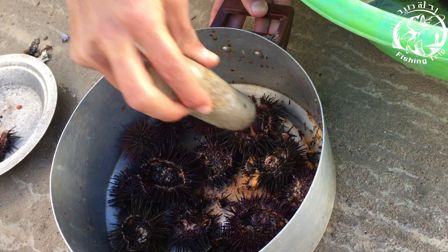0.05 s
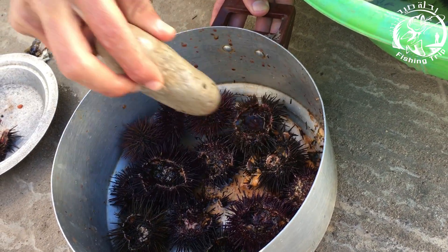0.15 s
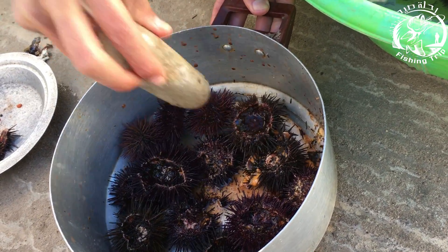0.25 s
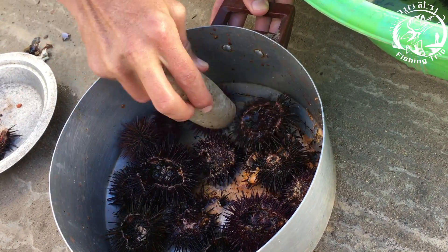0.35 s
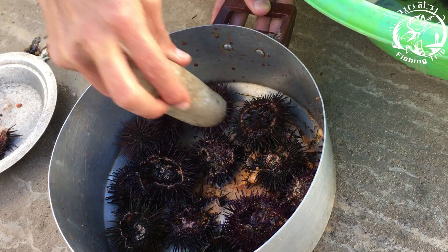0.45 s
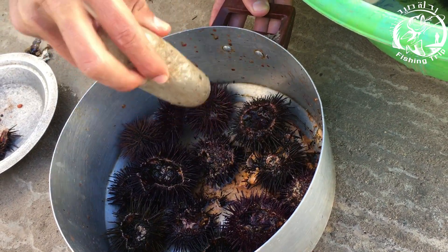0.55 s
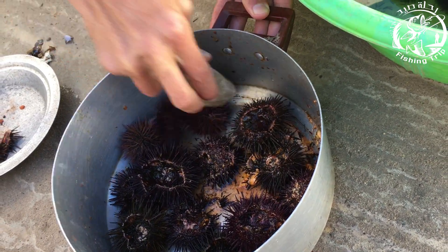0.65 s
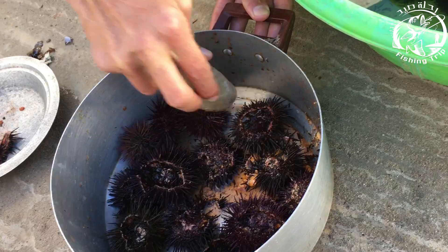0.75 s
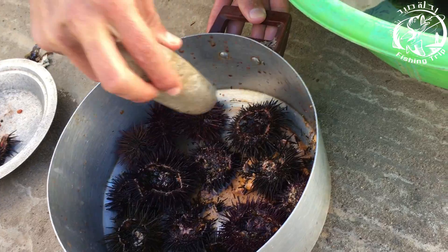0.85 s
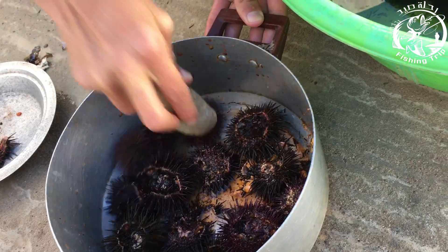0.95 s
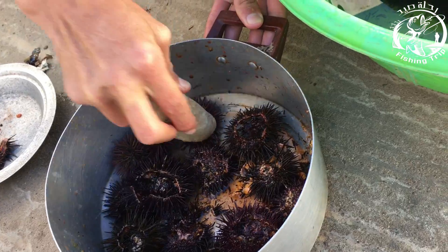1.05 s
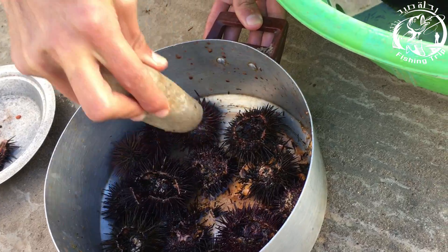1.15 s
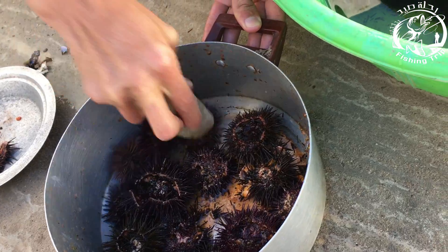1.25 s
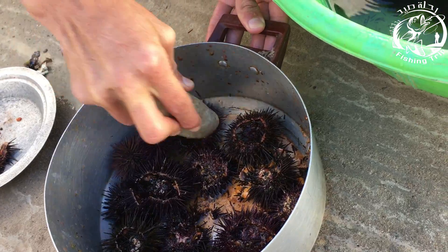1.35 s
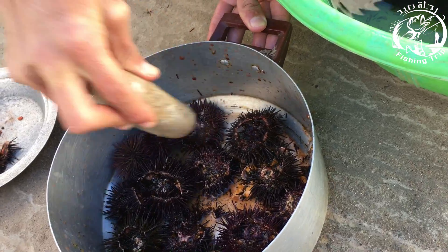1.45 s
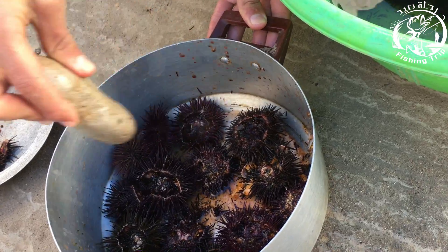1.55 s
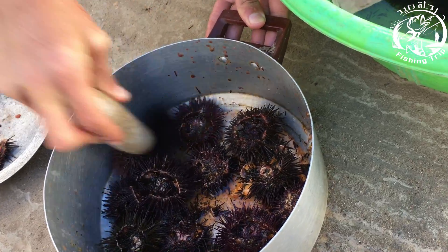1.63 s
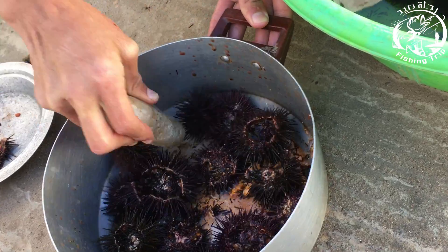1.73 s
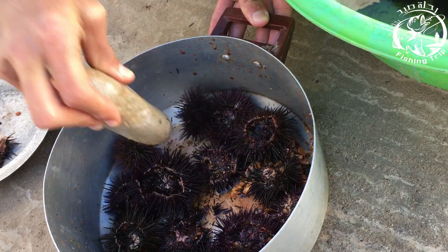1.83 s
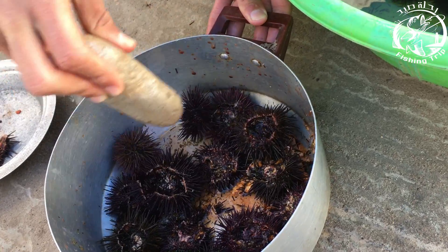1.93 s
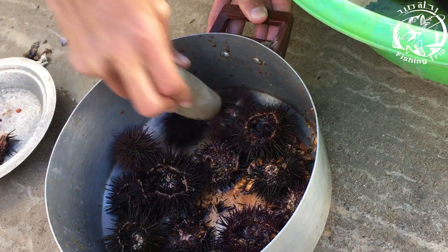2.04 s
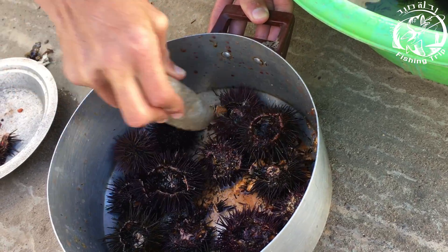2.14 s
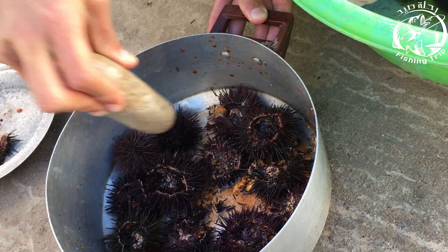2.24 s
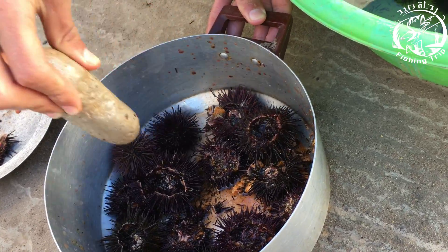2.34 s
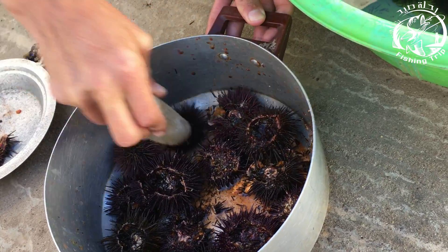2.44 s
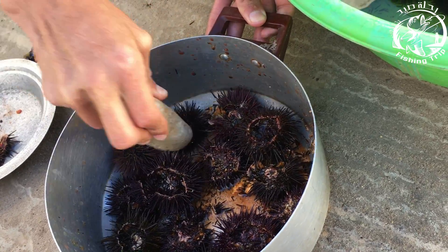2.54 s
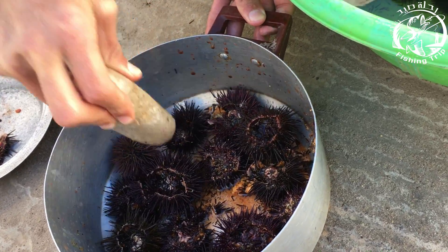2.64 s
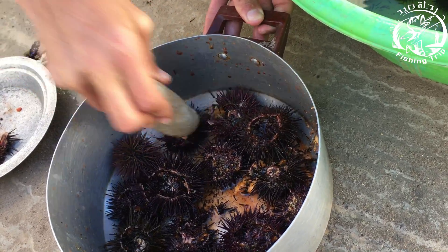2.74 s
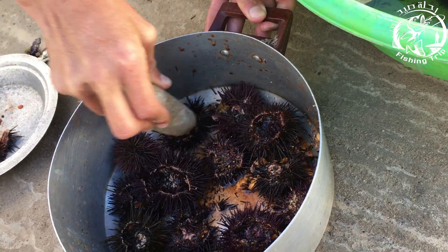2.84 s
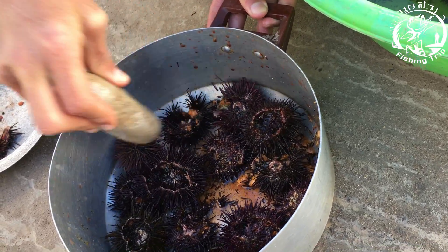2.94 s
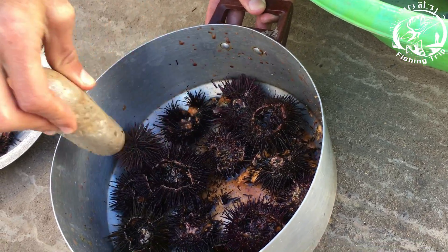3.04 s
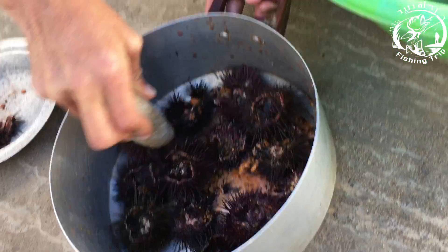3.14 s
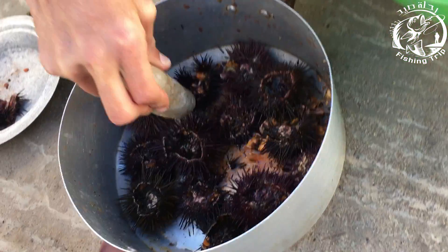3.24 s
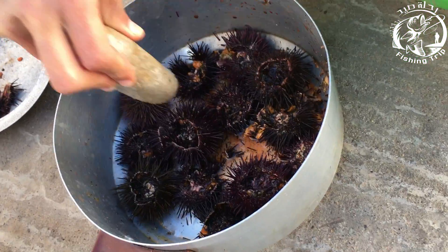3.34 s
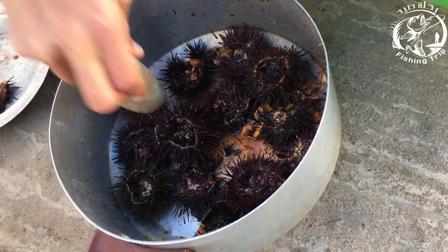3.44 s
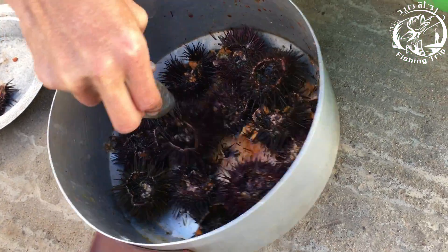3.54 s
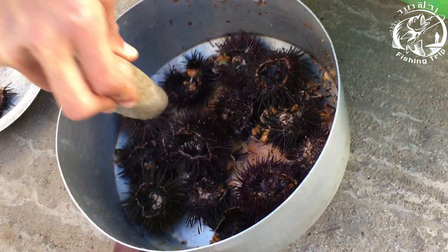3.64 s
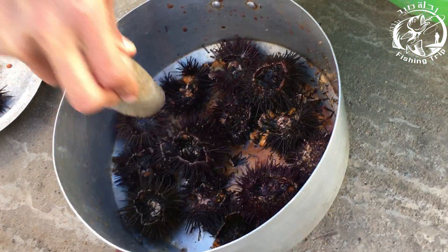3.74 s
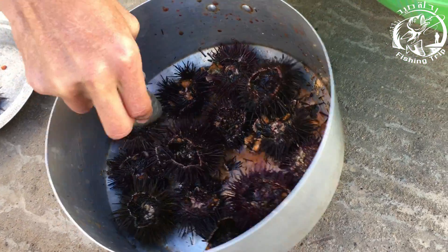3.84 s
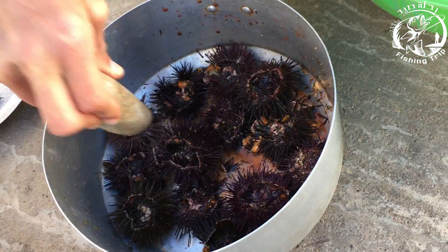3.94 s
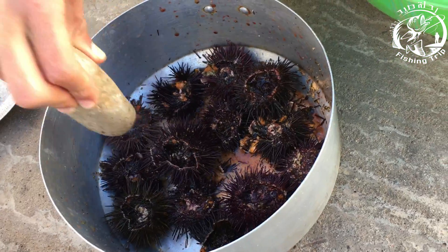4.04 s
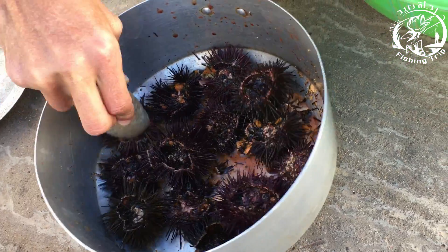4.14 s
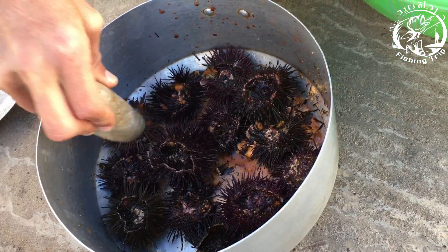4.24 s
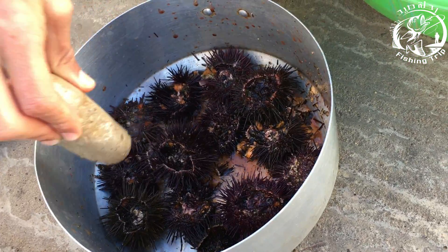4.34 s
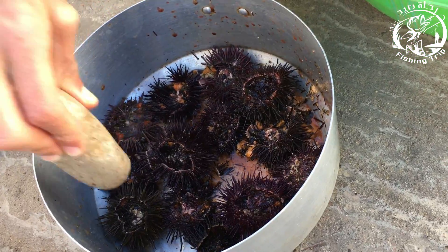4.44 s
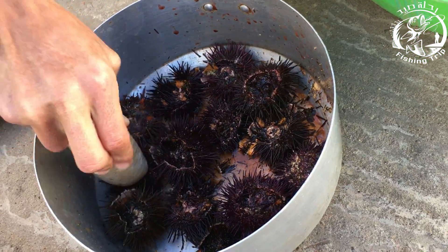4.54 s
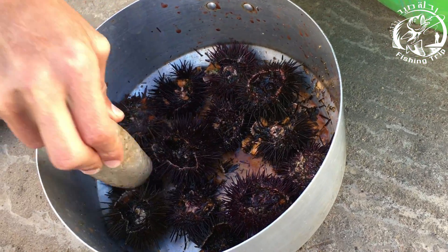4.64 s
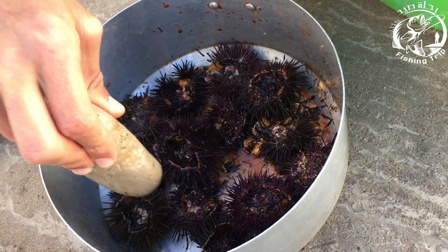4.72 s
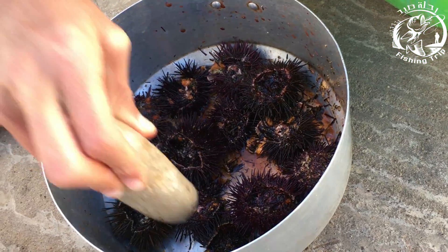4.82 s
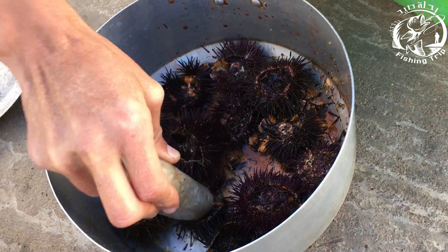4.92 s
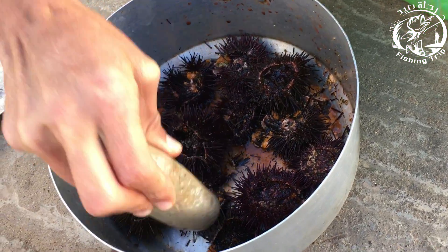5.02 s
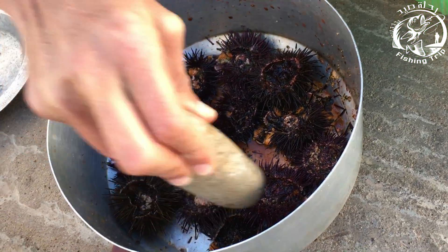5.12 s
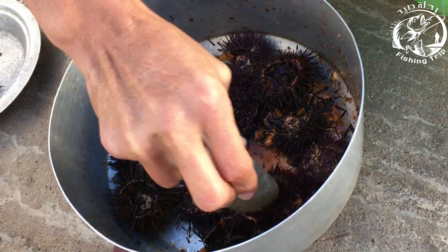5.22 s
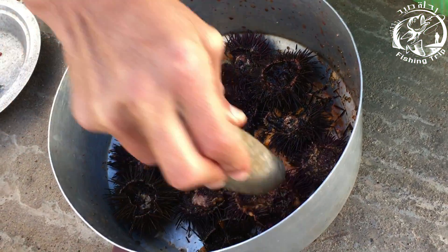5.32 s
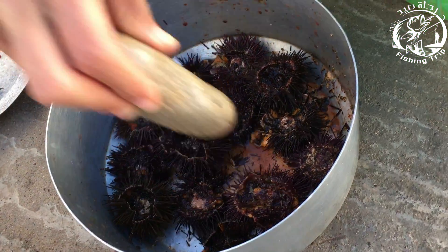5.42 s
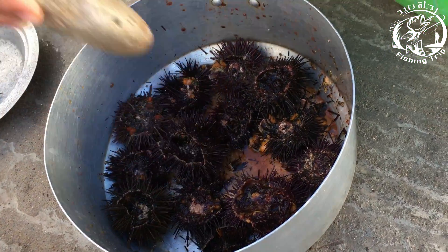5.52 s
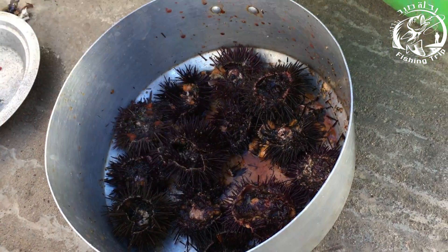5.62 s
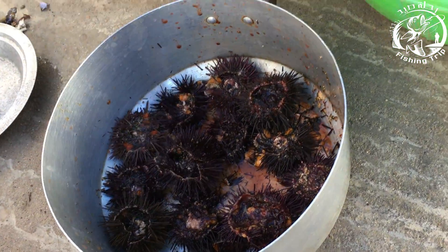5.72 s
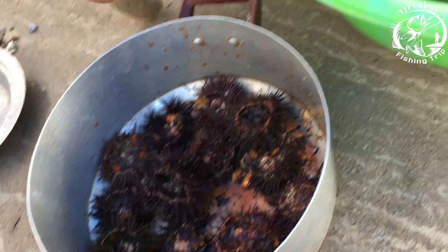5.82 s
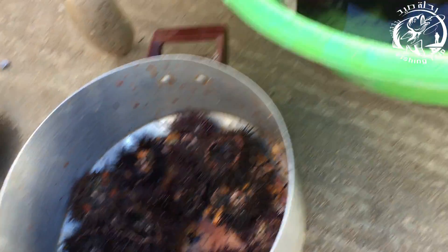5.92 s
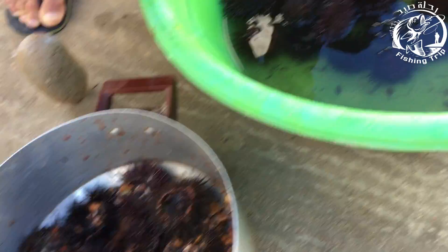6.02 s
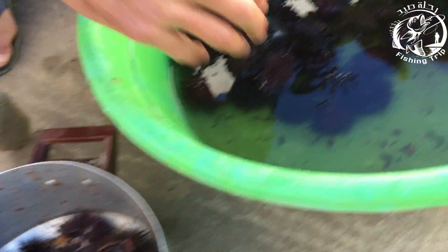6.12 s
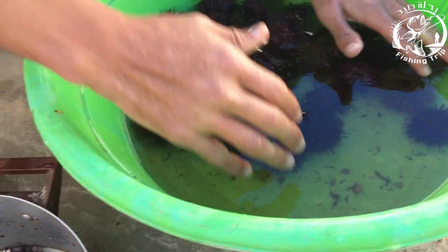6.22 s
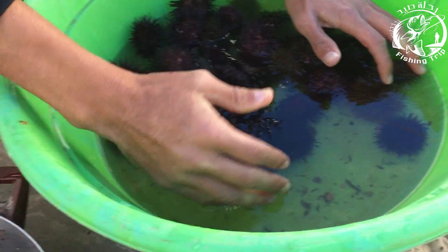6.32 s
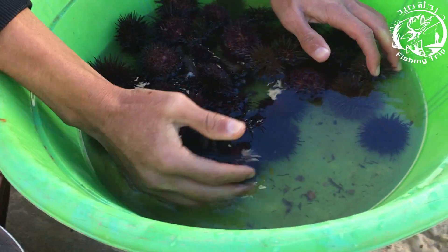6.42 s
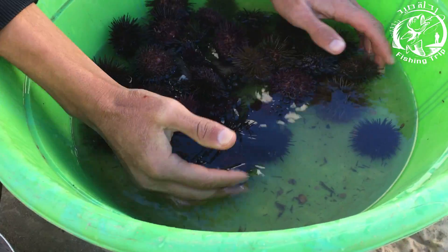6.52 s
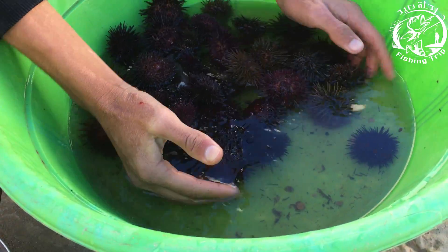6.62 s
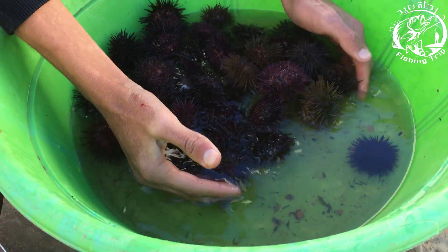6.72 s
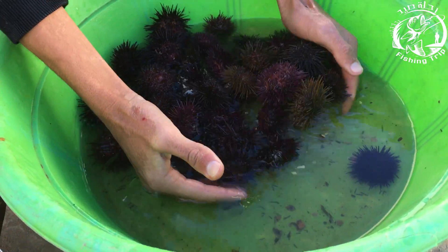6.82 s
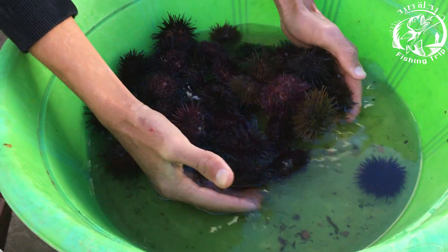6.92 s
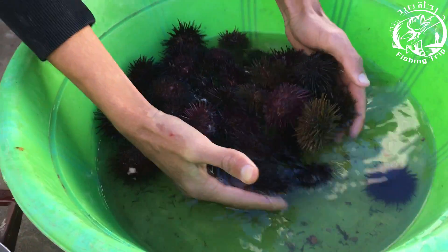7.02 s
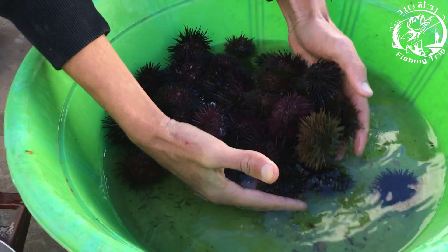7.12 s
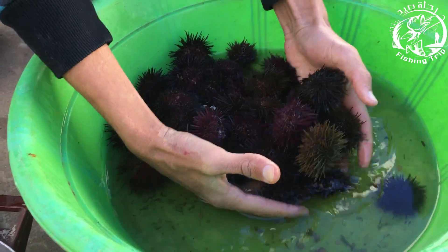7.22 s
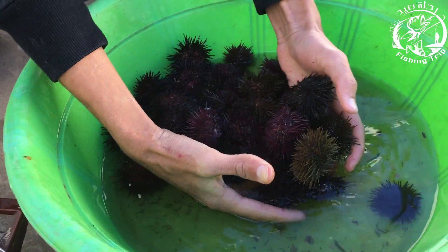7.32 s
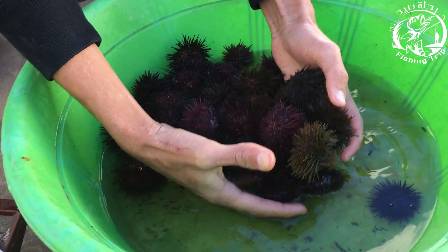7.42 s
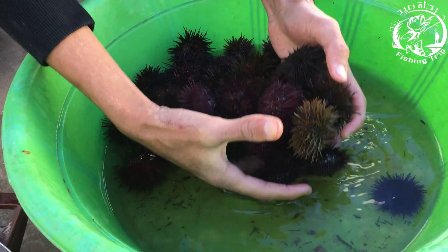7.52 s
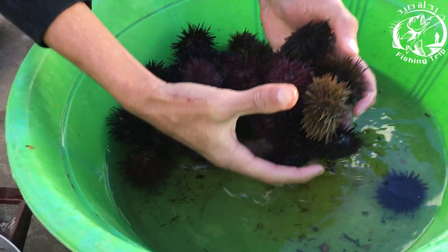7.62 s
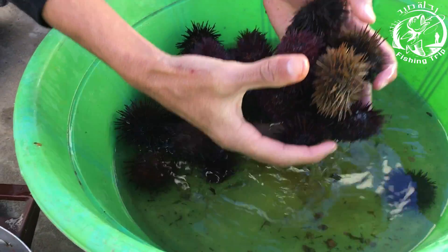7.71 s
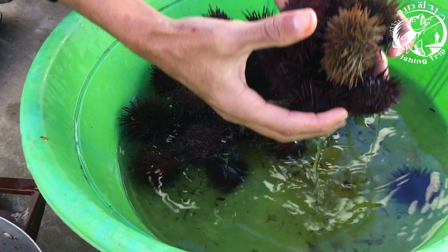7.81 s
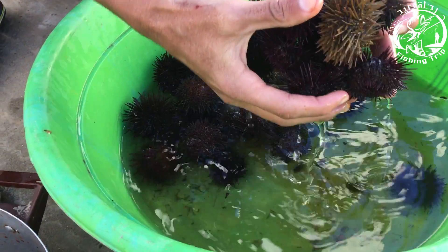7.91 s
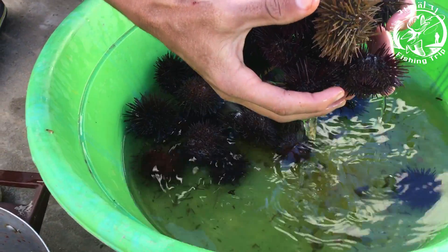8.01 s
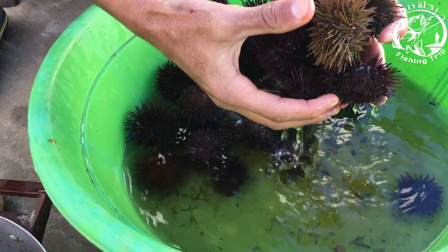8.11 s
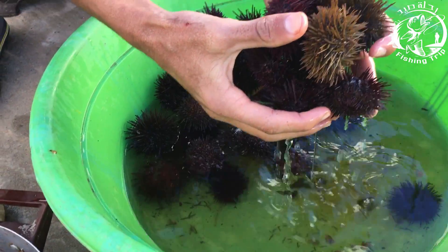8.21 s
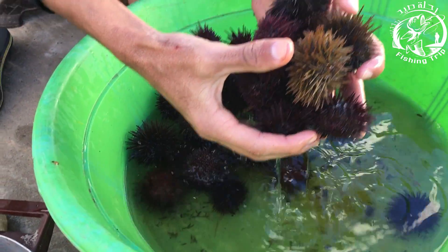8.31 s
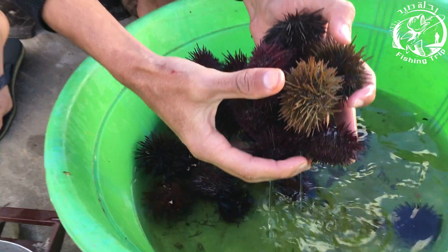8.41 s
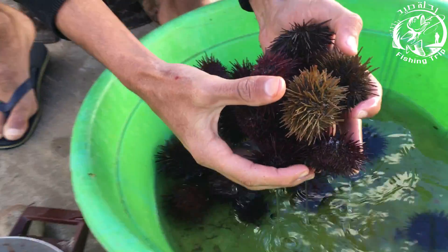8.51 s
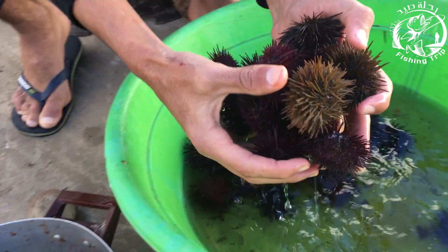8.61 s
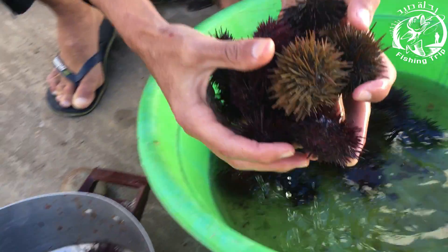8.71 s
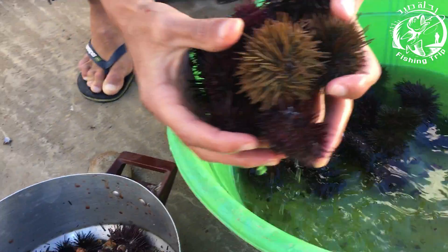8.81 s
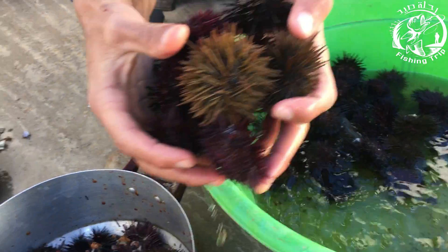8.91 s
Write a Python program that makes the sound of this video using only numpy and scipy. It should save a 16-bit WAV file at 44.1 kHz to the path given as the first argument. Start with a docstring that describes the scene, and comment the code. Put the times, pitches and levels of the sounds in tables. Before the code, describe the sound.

Outdoors and very close, the tail of a crunch and a few light clicks open the scene. From 0.4 to 5.3 seconds a stone pounds sea urchins in a metal pot, roughly every third of a second, with a quick doubled hit near 1.8. Each blow is a short, bright, splintery crack with a damped metal clank, some sharper and more pitched, followed by raining chips; later blows carry more low pot-bottom thump. Small snaps and crunches fill gaps. At 5.9 the stone lands with a dull hard knock. From 6.1 hands stir water in a plastic basin with soft bubbling and bumps; wet spines rasp and tick, strongest around 7.0 to 7.3, and low stuttering judders rub the wall from 7.2 to 7.75. After a knock at 7.85, drops plop and chirp until 8.8. Faint yard echo, low air rumble and thin hiss remain underneath.

```python
"""The tail of a blow and a few clicks, then a stone pounds sea urchins in a metal pot outdoors: each blow is a
burst of random fracture clicks through spine, pot-wall and pot-bottom responses. The stone is put down with a
dull knock. Hands rake more urchins together in a plastic basin of water: spines hiss as clicks and ringing grains
and judder along the wall as stick-slip pulses; water drips back as ringing bubbles while the heap is lifted.
Close reflections, a faint yard echo and shaped-noise air surround it."""
import sys
import numpy as np
from scipy import signal
from scipy.fft import rfft, irfft
from scipy.io import wavfile
from scipy.ndimage import uniform_filter1d

SR = 44100
rng = np.random.default_rng(int(sys.argv[2]) if len(sys.argv) > 2 else 0)


def wrap_up_sound(samples):
    """Save the sound to the file named by the first command line argument, as 16-bit audio."""
    columns = np.atleast_2d(samples).T
    # keep every value between -1 and 1, then stretch to whole-number steps
    tamed = np.clip(columns, -1, 1)
    steps = np.round(tamed * 32767).astype(np.int16)
    wavfile.write(sys.argv[1], SR, steps)


N = 395136  # samples

# blows of the stone: start_s, crush_s, shell_rel_db, bottom_rel_db, ground_thud_rel_db
BLOW_ROWS = [(0.411, 0.021, -8, -34, -22), (0.748, 0.017, -12, -31, -24), (1.058, 0.016, -8.5, -40, -27.5),
             (1.352, 0.015, -11, -35, -30), (1.759, 0.0028, -10.5, -23, -44.5),
             (1.774, 0.018, -13.5, -24.5, -43), (1.799, 0.0036, -7.5, -14.5, -28),
             (2.148, 0.038, -13.5, -28.5, -34), (2.55, 0.02, -14.5, -35.5, -30.5),
             (2.871, 0.017, -16, -28, -43.5), (3.236, 0.017, -15, -18, -35.5),
             (3.572, 0.017, -9, -16.5, -28), (3.897, 0.016, -16, -19.5, -37),
             (4.22, 0.014, -15, -17, -33.5), (4.637, 0.013, -10.5, -14, -30),
             (4.979, 0.02, -10.5, -26.5, -54.5), (5.265, 0.036, -9.5, -43.5, -58.5)]
# pot wall resonances: mode_hz, width_hz, rel_db
WALL_MODES = [(505, 53, -2.5), (631, 48, -1), (965, 81.6, 4), (1073, 185, -1.5), (1407, 72, 1.5),
              (1580, 190, -6), (1945, 150, 1), (2280, 320, -4.5), (2690, 70, -8), (3180, 130, -11),
              (4580, 1500, -20.5)]
# loose piece of shell, a clack without clear pitch: mode_hz, width_hz, rel_db
FRAGMENT_MODES = [(700, 3800, 0)]
# spectrum of splintering spines: freq_hz, rel_db_per_hz
SPINE_SPECTRUM = [(300, -27), (1200, -5), (3600, -3), (5000, -3), (6700, 0.5), (7600, -5), (8600, 0),
                  (10400, -8), (11200, -4), (14000, -6), (16000, -11)]
# spectrum of raked wet spines, also used for fine spray: freq_hz, rel_db_per_hz
RAKE_SPECTRUM = [(1200, 0), (2500, -6), (6700, -0.5), (9000, 1.5), (10400, -0.5), (12200, 0), (16000, 1)]
# spectrum of stirred water: freq_hz, rel_db_per_hz
SLOSH_SPECTRUM = [(150, -19), (330, -2), (600, 1.5), (1200, -5), (1700, -11.5), (4000, -16), (7000, -29)]


def amp(db):
    """Decibels to gain."""
    return 10 ** (np.asarray(db) / 20)


def evened(x):
    """Scales to rms 1."""
    return x / np.sqrt(np.mean(x ** 2) + 1e-20)


def read(points, hz):
    """Interpolates a curve of (Hz, value) on a log-frequency axis."""
    f, value = np.transpose(points)
    return np.interp(np.log(hz + 1), np.log(f + 1), value)


def add(mix, start_s, sound):
    """Mixes a sound in at start_s, cut at the end of the mix."""
    part = mix[max(round(start_s * SR), 0):][:len(sound)]
    part += sound[:len(part)]


def filtered(x, response):
    """Convolves a full-length signal and keeps its first N samples."""
    return signal.oaconvolve(x, response)[:N]


def colour(points, size=4096):
    """Minimum-phase impulse response with the given spectrum."""
    db = np.maximum(read(points, abs(np.fft.fftfreq(size, 1 / SR))), -100)
    log_spectrum = np.conj(signal.hilbert(np.log(amp(db))))
    return np.fft.ifft(np.exp(log_spectrum)).real[:size // 2]


def ring(modes, scatter_db=0, detune=0, size=3500):
    """Impulse response of decaying resonances; the spot that is struck changes their shares."""
    t = np.arange(size) / SR
    hz, width_hz, db = np.transpose(modes)[:, :, None]
    share, shift = rng.standard_normal((2, len(modes), 1))
    polarity = (-1) ** np.arange(len(modes))[:, None]
    swing = polarity * np.sin(2 * np.pi * hz * (1 + detune * shift) * t)
    level = amp(db + scatter_db * share) * width_hz
    sound = (level * np.exp(-np.pi * width_hz * t) * swing).sum(0)
    # little radiates below the lowest mode
    return signal.sosfilt(signal.butter(2, hz.min(), "high", fs=SR, output="sos"), sound)


def sounded(drive, response, db, length_s):
    """A drive through a response, with the energy of level db held for length_s."""
    y = signal.fftconvolve(drive, response)
    return amp(db) * y * np.sqrt(length_s * SR / (np.sum(y ** 2) + 1e-20))


def snaps(per_s, spread_db, size):
    """Random clicks of either sign, a few much larger than the rest."""
    happens = rng.random(size) < per_s / SR
    big = np.minimum(rng.exponential(1, size), 4)
    return happens * rng.choice([-1, 1], size) * amp(spread_db * big)


def press(length_s, rise_s, fall_s, size=5000):
    """A push: builds, holds while it travels, then dies away."""
    t = np.arange(size) / SR
    return np.minimum(t / rise_s, 1) ** 2 * np.exp(-np.maximum(t - length_s, 0) / fall_s)


def gestures(rows, rise_s, fall_s, ease_db_per_s=0):
    """Strength of movements (start_s, length_s, level_db): each builds, holds while easing off, dies away."""
    out, t = np.zeros(N), np.arange(2 * SR) / SR
    for start_s, length_s, db in rows:
        push = press(length_s, rise_s, fall_s, size=len(t))
        add(out, start_s, amp(db - ease_db_per_s * t) * push)
    return out


def wander(rate_hz):
    """Random curve of rms 1, its spectrum falling exponentially with frequency over rate_hz."""
    keep = np.exp(-np.fft.rfftfreq(N, 1 / SR) / rate_hz)
    return evened(irfft(rfft(rng.standard_normal(N)) * keep, N))


def bubble(hz, cycles, glide):
    """A trapped air bubble rings and decays, its pitch rising from hz towards hz * (1 + glide)."""
    turns = np.arange(0, 5 * cycles, hz / SR)
    age = turns / cycles
    pitch_hz = hz * (1 + glide * np.tanh(age / 2))
    swing = np.sin(2 * np.pi * np.cumsum(pitch_hz) / SR)
    return (1 - np.exp(-turns / 2.4)) * np.exp(-age) * swing


def fizz(spectrum, lo_hz, hi_hz, per_s, spread_db, cycles, start_s=6, stop_s=8.87, count=24):
    """Many tiny ringing grains of count pitches between start_s and stop_s, at rms 1 over that span."""
    size = round((stop_s - start_s) * SR)
    cloud, out = np.zeros(size), np.zeros(N)
    for hz in np.geomspace(lo_hz, hi_hz, count):
        grain = hz * amp(read(spectrum, hz)) * bubble(hz, cycles, rng.uniform(0, 0.068))
        for at, chance in rng.random((int(per_s * size / SR / count), 2)):
            big = min(-np.log(1 - chance), 4)
            add(cloud, at * size / SR, grain * amp(spread_db * big))
    add(out, start_s, evened(cloud))
    return out


def air(level_db=-44.0, gust_db=6):
    """Outdoor background: shaped noise, a lumpy low rumble under a faint even hiss."""
    # freq_hz, rel_db_per_hz
    air_spectrum = [(18, -29.5), (35, -7.5), (50, 4), (85, 2), (160, -10), (280, -20.5), (600, -27.5),
                    (1570, -26.5), (2900, -36.5), (9000, -42.5), (16000, -53)]
    hz = np.fft.rfftfreq(N, 1 / SR)
    noise = evened(irfft(rfft(rng.standard_normal(N)) * amp(read(air_spectrum, hz)), N))
    rumble = irfft(rfft(noise) / (1 + (hz / 200) ** 4), N)
    gust = amp(gust_db * np.tanh(wander(5.2)))
    return amp(level_db) * (noise + rumble * (gust - 1))


def bumps(gain_db=-2, swell_s=0.0046):
    """Soft handling bumps: a few cycles of low thump each, under a swelling and decaying envelope."""
    # start_s, pitch_hz, rel_db
    bump_rows = [(2.673, 164, -36.5), (6.429, 81.4, -25.5)]
    out, t = np.zeros(N), np.arange(6000) / SR
    for start_s, hz, db in bump_rows:
        thump = t * np.exp(-t / swell_s) * np.sin(2 * np.pi * hz * t)
        add(out, start_s, sounded(np.ones(1), thump, db + gain_db, 0.03))
    return out


def drips(gain_db=6, cycles=11, linger=1.3, glide=0.86, splat_db=-5, splat_s=0.0019, small_db=-55, spray_db=-56):
    """Water runs off the lifted heap: each drop plops and traps a bubble; small bubbles and spray tick between."""
    # start_s, bubble_start_hz, rel_db, shallowness (0-1)
    drip_rows = [(7.929, 2960, -37.5, 0.16), (8.073, 903, -42, 0.04), (8.095, 5040, -39.5, 0.2),
                 (8.099, 1390, -37, 0.3), (8.12, 3500, -51, 0.8), (8.166, 1700, -50, 1),
                 (8.291, 1286, -45, 0.3), (8.321, 2430, -53, 0.1), (8.406, 1114, -37.5, 0),
                 (8.432, 3430, -40.5, 0.1), (8.43, 1720, -46, 0), (8.487, 1470, -50, .1),
                 (8.516, 2280, -43, .1), (8.518, 1460, -42, .05), (8.601, 2180, -41.5, 0.24),
                 (8.618, 5900, -35, 0.13), (8.663, 5700, -40, 0.1), (8.719, 3520, -44, 0.15),
                 (8.755, 3530, -41, 0.4)]
    run_off_s, run_off_length_s, run_off_rise_s, run_off_fall_s = 7.9, 0.86, 0.083, 0.086
    out, t = np.zeros(N), np.arange(SR // 20) / SR
    for start_s, hz, db, shallow in drip_rows:
        # deep bubbles hold their pitch, shallow ones chirp upwards for longer
        chirp = bubble(hz, cycles * (1 + linger * shallow), glide * shallow)
        add(out, start_s, amp(db + gain_db) * chirp)
        plop = rng.standard_normal(len(t)) * np.exp(-t / splat_s)
        # the larger the drop, the lower its plop
        add(out, start_s - 0.002, sounded(plop, ring([(hz, hz, 0)]), db + splat_db, 2 * splat_s))
    small = amp(small_db) * fizz(SLOSH_SPECTRUM, 848, 3220, 150, 4.9, 7.4, start_s=8.29, stop_s=8.6)
    spray = amp(spray_db) * fizz(RAKE_SPECTRUM, 2400, 13000, 260, 4, 4, start_s=run_off_s)
    run_off = gestures([(run_off_s, run_off_length_s, 0)], run_off_rise_s, run_off_fall_s)
    return out + small + spray * run_off


def judder(slip_hz=194, jitter=0.1484, scrape=0.08):
    """Spines stick and slip on the plastic wall, nearly in step with one of its lowest resonances."""
    # basin wall: mode_hz, width_hz, rel_db
    basin_modes = [(154, 12, 4), (199.5, 13.7, 5), (300, 34, -7), (410, 76, -14.5), (537, 200, -28)]
    # bouts: start_s, length_s, initial_level_db
    bout_rows = [(7.16, 0.024, -33.5), (7.22, 0.13, -33.5), (7.44, 0.19, -23.5), (7.65, 0.098, -28.5)]
    unsteady = evened(uniform_filter1d(rng.standard_normal(N), 300))
    turns = np.cumsum(slip_hz * (1 + jitter * unsteady)) / SR
    slips = np.diff(np.floor(turns), prepend=0)
    wall = filtered(slips + scrape * rng.standard_normal(N), ring(basin_modes))
    # each bout catches quickly, eases off and lets go
    return evened(wall) * gestures(bout_rows, rise_s=0.018, fall_s=0.04, ease_db_per_s=31)


def basin(rake_db=-1, wet_db=-5, water_db=-4.0, churn_db=-6.0, surge_db=2.0):
    """Wet spines flick against each other in fits while the hands churn the water into bubbles."""
    # strokes of the hands: start_s, length_s, rub_rel_db, stir_rel_db
    stroke_rows = [(6.072, 0.15, -68, -40), (6.404, 0.32, -60.5, -38.5), (6.66, 0.2, -45, -41),
                   (6.99, 0.34, -37.5, -41), (7.372, 0.39, -48.5, -43.5), (7.767, 0.24, -62, -43.5)]
    rise_s, rub_fall_s, water_fall_s = 0.083, 0.11, 0.075
    start_s, length_s, rub_db, stir_db = np.transpose(stroke_rows)
    rubbing = gestures(zip(start_s, length_s, rub_db), rise_s, rub_fall_s)
    stirring = gestures(zip(start_s, length_s, stir_db), rise_s, water_fall_s)
    flicks = evened(filtered(snaps(2400, 3.8, N), colour(RAKE_SPECTRUM)))
    plinks = fizz(RAKE_SPECTRUM, 2000, 14500, 800, 6, 5)
    spines = amp(rake_db) * flicks + amp(wet_db) * plinks
    churn = evened(filtered(snaps(1300, 3.8, N), colour(SLOSH_SPECTRUM)))
    bubbles = fizz(SLOSH_SPECTRUM, 290, 1990, 750, 5.3, 4.3)
    water = amp(water_db) * bubbles + amp(churn_db) * churn
    return (spines * rubbing + water * stirring) * amp(surge_db * wander(34.0))


def knocks(rattle=0.12, rattle_s=0.0058, length_s=0.011):
    """Stone put down and basin knocked: one hard contact, a brief chatter behind it, almost no ring."""
    # start_s, low_db, bright_db
    knock_rows = [(5.932, -12, -28.5), (6.122, -34, -34.5), (6.142, -26.5, -33.5), (6.419, -19, -30),
                  (6.616, -21.5, -27), (7.362, -37, -54), (7.761, -31, -47), (7.844, -21, -34)]
    # freq_hz, rel_db_per_hz
    low_spectrum = [(40, -48), (95, 3), (220, -8.5), (580, 3), (720, -2), (1250, -6), (1600, -8.5),
                    (2100, -16.5), (5000, -63.5)]
    # freq_hz, rel_db_per_hz
    bright_spectrum = [(400, -63), (1200, 14), (2200, 4), (3600, -7), (5000, -24), (9000, -17.5),
                       (16000, -27)]
    out, t = np.zeros(N), np.arange(2000) / SR
    for start_s, low_db, bright_db in knock_rows:
        chatter = rattle * rng.standard_normal(len(t)) * np.exp(-t / rattle_s)
        drive = (t == 0) + chatter
        add(out, start_s, sounded(drive, colour(low_spectrum), low_db, length_s))
        add(out, start_s, sounded(drive, colour(bright_spectrum), bright_db, length_s))
    return out


def debris(chips_db=-35, settle_s=0.028, heap_db=-2, shell_db=-3, creep_db=-64, creep_s=0.18, clump_db=3):
    """Chips rain down after each blow, the crushed heap creeps on faintly and crunches in clumps."""
    # dying crunch of a blow just before the start, then crunches as the heap shifts: start_s, length_s, rel_db
    crunch_rows = [(0, 0.076, -38.5), (1.97, 0.091, -48.5), (2.78, 0.11, -40.5), (3.07, 0.13, -49.5),
                   (3.64, 0.19, -44.5), (5.41, 0.1, -48.5)]
    falling, t = np.zeros(N), np.arange(SR) / SR
    chips = snaps(600, 4.2, N) * amp(clump_db * wander(60))
    for start_s, crush_s, *_ in BLOW_ROWS:
        rain = amp(chips_db) * np.exp(-t / settle_s)
        creep = amp(creep_db) * np.exp(-t / creep_s)
        add(falling, start_s + crush_s, rain + creep)
    spines = evened(filtered(chips, colour(SPINE_SPECTRUM)))
    shell = evened(filtered(chips, ring(FRAGMENT_MODES)))
    crunching = amp(heap_db) * gestures(crunch_rows, rise_s=0.0059, fall_s=0.023)
    return (spines + amp(shell_db) * shell) * (falling + crunching)


def touches(shell_db=-4, clack_db=-3):
    """Light snaps and clacks in the pot between and around the blows, and once as it is handled afterwards."""
    # start_s, length_s, spines_db, shell_rel_db
    touch_rows = [(0.001, 0.006, -27, -28), (0.061, 0.0026, -43.5, -18), (0.595, 0.003, -48, -36.5),
                  (0.775, 0.0046, -20, -16), (1.574, 0.0024, -47, -49.5), (1.958, 0.0015, -45.5, -20.5),
                  (2.008, 0.0017, -38, -31.5), (2.837, 0.0022, -29, -29.5), (2.923, 0.0021, -29, -45.5),
                  (2.979, 0.0025, -28, -33), (3.02, 0.0011, -38, -44.5), (3.167, 0.0033, -43.5, -46.5),
                  (3.308, 0.024, -33.5, -25.5), (3.37, 0.0022, -35, -30.5), (3.673, 0.0075, -36.5, -24.5),
                  (3.759, 0.0041, -31, -28.5), (3.781, 0.0044, -42.5, -31.5), (3.978, 0.011, -35.5, -28),
                  (4.274, 0.032, -33, -29.5), (4.625, 0.0075, -29, -27), (4.718, 0.0097, -36.5, -56),
                  (5.332, 0.0028, -27, -34), (5.464, 0.0065, -34.5, -39), (6.233, 0.017, -69, -38)]
    out, spines = np.zeros(N), colour(SPINE_SPECTRUM)
    for start_s, length_s, spine_db, mid_db in touch_rows:
        force = press(0.9 * length_s, 0.00035, 0.0064)
        drive = snaps(2500, 2.3, len(force)) * force
        rub = rng.standard_normal(len(force)) * force
        add(out, start_s, sounded(drive, spines, spine_db, length_s))
        add(out, start_s, sounded(drive, ring(WALL_MODES, 1.4, 0.015), mid_db + shell_db, length_s))
        add(out, start_s, sounded(rub, ring(FRAGMENT_MODES), mid_db + clack_db, length_s))
    return out


def clacks(length_s=0.011, width_hz=450):
    """Short bright or pitched clacks, an early click and then colour on some blows: clicks through one resonance."""
    # start_s, pitch_hz, level_db
    clack_rows = [(0.062, 2204, -24.5), (0.417, 3270, -14), (2.557, 2700, -12.5), (2.56, 4060, -15.5),
                  (2.873, 3270, -18.5), (4.222, 1011, -13.5), (5.283, 2900, -12)]
    out = np.zeros(N)
    for start_s, hz, db in clack_rows:
        force = press(length_s, 0.001, 0.0038)
        clicks = snaps(1900, 11, len(force)) * force
        add(out, start_s, sounded(clicks, ring([(hz, width_hz, 0)]), db, length_s))
    return out


def pounding(shell_db=-1.5, bottom_db=1, thud_db=1, lead_s=0.0057, brush=0.19, lumpy_db=3.0):
    """The stone brushes spine tips, splinters spines, cracks shell and at last pushes on the pot bottom."""
    # loaded pot bottom: mode_hz, width_hz, rel_db
    bottom_modes = [(151, 30, -4.5), (211, 73, -7), (320.2, 47, -2), (389, 50, 0.5), (529, 29, 0),
                    (697, 70, -10)]
    spines_db = -11  # the same under every blow
    out, spines = np.zeros(N), colour(SPINE_SPECTRUM)
    ground = ring([(55.0, 85, -1), (168, 200, -14.0)])  # the whole pot thuds on the concrete
    for start_s, crush_s, mid_db, low_db, ground_db in BLOW_ROWS:
        tips = press(1.16 * crush_s, 0.0009, 0.004, size=3500)
        shell = press(crush_s, 0.0013, 0.0063, size=3500)
        size = len(tips)
        t = np.arange(size) / SR
        # the shell fails in steps
        steps = evened(uniform_filter1d(rng.standard_normal(size), size=130))
        gives_way = amp(lumpy_db * steps)
        fractures = snaps(4000, 3.8, size)
        splinters = fractures + 1.6 * snaps(16000, 4.2, size)

        splintering = splinters * gives_way * tips * np.exp(-t / 0.033)
        add(out, start_s, sounded(splintering, spines, spines_db, crush_s))
        brushing = splinters * press(lead_s, lead_s, 0.00059, size)
        add(out, start_s - lead_s, sounded(brushing, spines, spines_db, brush ** 2 * lead_s))
        cracking = fractures * gives_way * shell
        add(out, start_s, sounded(cracking, ring(WALL_MODES, 3.4, 0.0072), mid_db + shell_db, crush_s))
        push = snaps(3000, 3.2, size) * press(crush_s, 0.49 * crush_s, 0.006, size)
        add(out, start_s, sounded(push, ring(bottom_modes, 1.0, 0.0094), low_db + bottom_db, crush_s))
        thud = sounded(np.ones(1), ground, ground_db + thud_db, crush_s)
        add(out, start_s + 0.83 * crush_s, thud)
    return out


def echoes(x, strength, t60, delay_s):
    """Scattered reflections over 1 s, each band with its own strength and t60; a negative t60 swells."""
    hz, t, z = signal.stft(rng.standard_normal(SR), SR, nperseg=256)
    decay = amp(-60 * t / read(t60, hz)[:, None])
    band_rms = np.sqrt(SR * np.mean(decay ** 2, axis=1, keepdims=True))
    decay *= amp(read(strength, hz))[:, None] / band_rms
    response = signal.istft(z * decay, SR, nperseg=256)[1]
    out = np.zeros(N)
    add(out, delay_s, signal.oaconvolve(x, response))
    return out


def scene():
    """Pot and basin, with close reflections, the faint echo of pot and yard, and outdoor air."""
    # close reflections: freq_hz, strength_db
    near_strength = [(100, -14), (400, -14), (1000, -22), (4000, -20), (16000, -21)]
    # ring of pot and yard: freq_hz, strength_db
    yard_strength = [(100, -26), (400, -17), (1000, -31), (2000, -31), (4000, -31.5), (8000, -32.5),
                     (16000, -37.5)]
    # ring of pot and yard: freq_hz, t60_s
    yard_decay = [(100, -2), (400, 1.03), (2000, 1.12), (8000, 0.4), (16000, 0.7)]
    near_decay = [(200, 0.87), (2000, 0.23), (12000, 0.047)]  # freq_hz, t60_s
    pot = pounding() + clacks() + touches() + debris()
    hands = knocks() + bumps() + basin() + judder() + drips()
    direct = pot + hands
    near = echoes(direct, near_strength, near_decay, 0.006)
    yard = echoes(direct, yard_strength, yard_decay, 0.019)
    return (direct + near + yard + air())[None]


def record(dry, ceiling=0.81, edge_hz=16100):
    """Rounds off the loudest peaks, then low-passes at edge_hz."""
    limited = dry / (1 + (dry / ceiling) ** 4) ** (1 / 4)
    lowpass = signal.firwin(401, edge_hz, window=("kaiser", 8), fs=SR)
    return signal.oaconvolve(limited, lowpass[None], "same")


dry = scene()
out = record(dry)
wrap_up_sound(out)
```